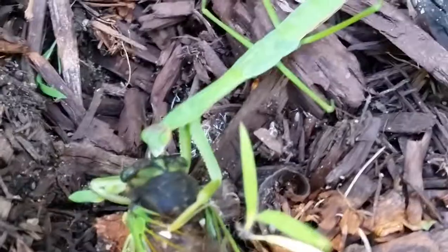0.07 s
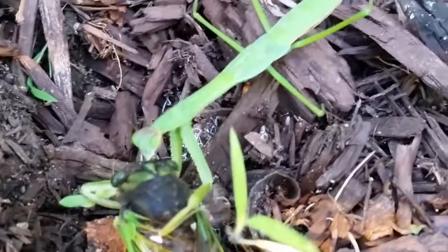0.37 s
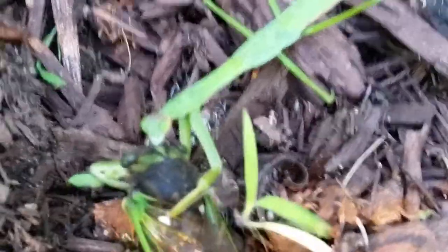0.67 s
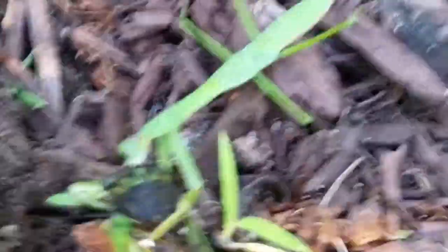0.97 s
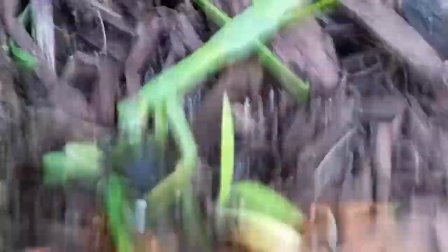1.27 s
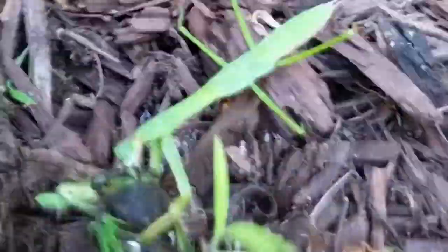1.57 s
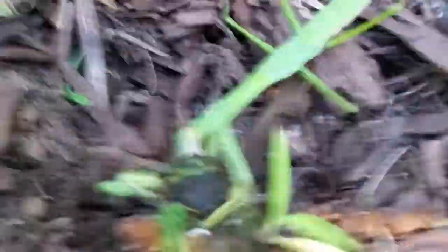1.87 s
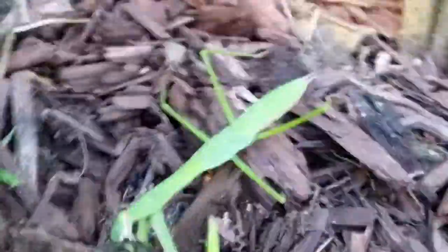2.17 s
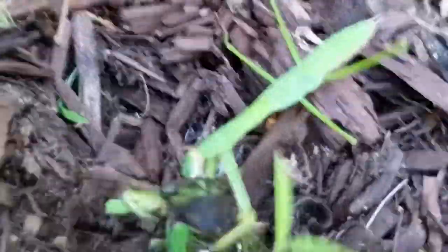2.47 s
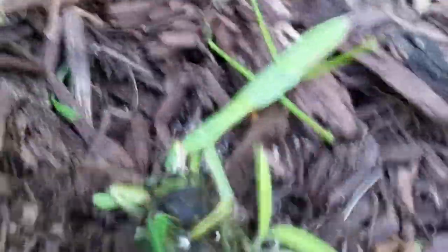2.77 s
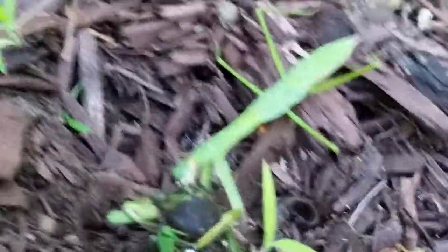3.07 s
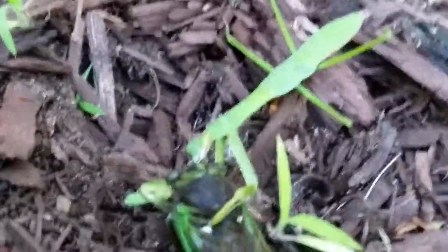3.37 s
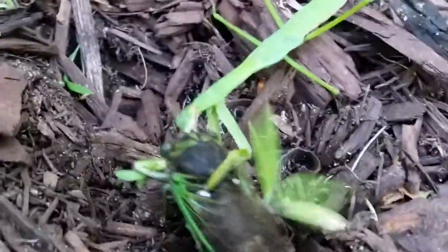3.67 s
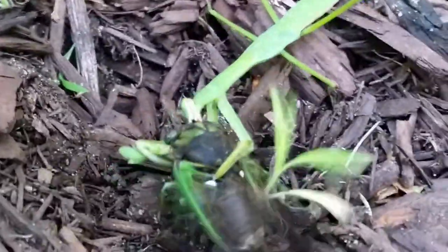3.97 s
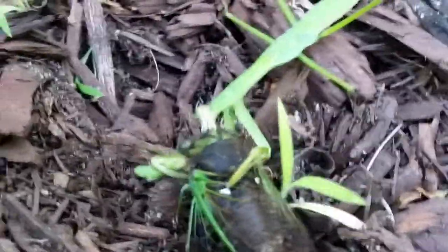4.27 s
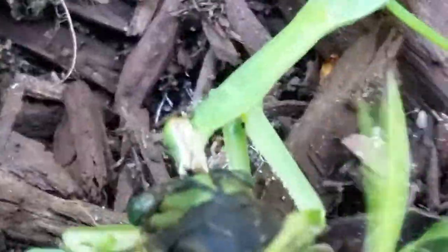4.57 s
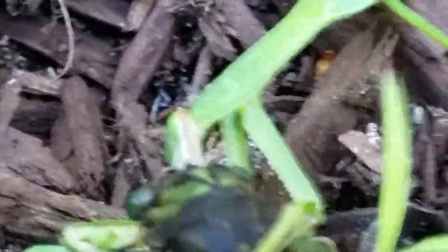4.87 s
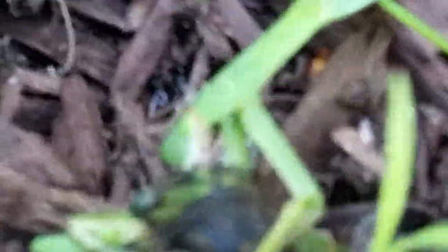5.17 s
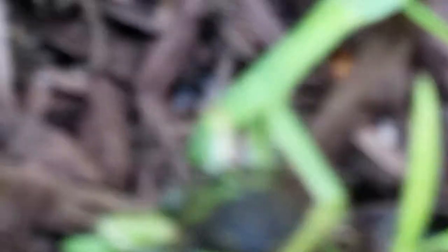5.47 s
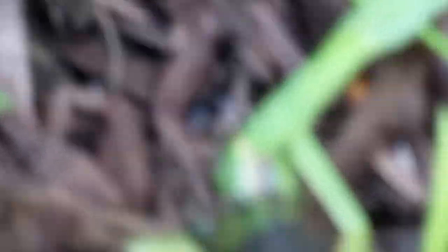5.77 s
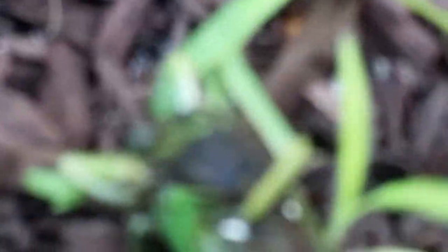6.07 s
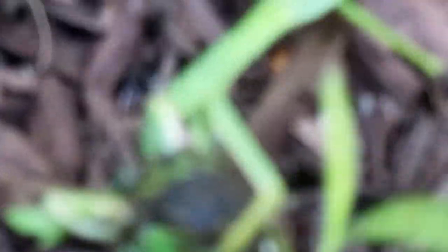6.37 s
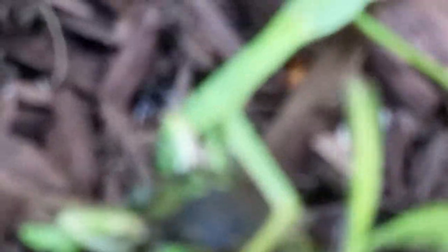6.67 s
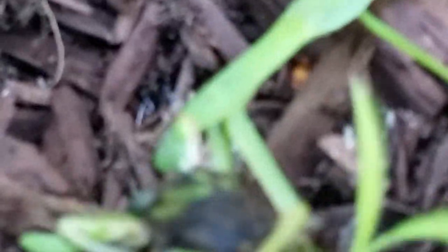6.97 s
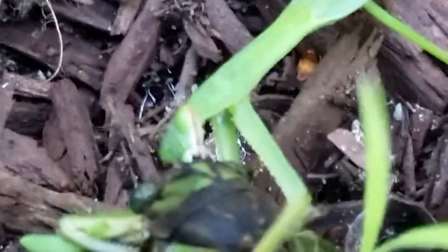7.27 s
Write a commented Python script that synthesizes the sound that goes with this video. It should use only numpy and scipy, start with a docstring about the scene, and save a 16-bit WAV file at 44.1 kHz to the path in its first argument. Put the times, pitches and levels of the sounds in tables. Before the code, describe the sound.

A cicada held by a mantis beats its wings against bark mulch in short, papery, rattling bursts, two or three a second. Early on, fingers knock and rub on the close hand-held microphone, giving dull thumps and a hiss. The flapping weakens briefly near the middle, then returns louder and in longer fits. Faint low rumble, leaves and distant insects sit underneath in the yard.

```python
"""A yard, down on the bark mulch: a cicada pinned by a mantis thrashes its wings in short fits,
about 33 beats a second. Each downstroke is a papery slap, each upstroke a weaker one, with dry
scraping between them and the odd snap of a bark chip. A hand-held phone close by adds finger
knocks and a rubbing hiss. Underneath sits a bed of low rumble, leaves and far-off insects."""
import sys
import numpy as np
from scipy import signal
from scipy.fft import rfft, irfft, next_fast_len
from scipy.io import wavfile
from scipy.ndimage import uniform_filter1d, map_coordinates

SR = 44100
rng = np.random.default_rng(int(sys.argv[2]) if len(sys.argv) > 2 else 0)


def materialize(psi):
    """Save the field psi as 16-bit PCM at rate SR to the path in sys.argv[1].

    A 1-D psi becomes a single channel; in a 2-D psi each row is a channel.
    """
    bounded = np.clip(np.atleast_2d(psi).T, -1, 1)
    quanta = np.round(bounded * 32767).astype(np.int16)
    wavfile.write(sys.argv[1], SR, quanta)


N = 322812
TIME = np.arange(N) / SR
GRIP_FROM_S, GRIP_TO_S = 1.15, 2.55  # the hand shifts its hold on the phone

# Levels and EQ gains are relative; pan_db is left minus right; correlation is between the channels.
# fader ride of the bed, dipping in the middle: time_s, level_db
BED_RIDE = [(0.4, -59), (1.0, -47), (2.75, -45), (3.15, -56.5), (3.5, -58.5), (3.85, -49.5), (4.3, -45),
            (6.1, -44.5), (7.3, -45.5)]
# tone of the low rumble: freq_hz, gain_db
RUMBLE_EQ = [(13, -41.5), (22, -12.5), (69, -2.5), (104, 1), (200, -7), (281, -13.5), (408, -17),
             (531, -23), (640, -26.5), (833, -44), (900, -39.5), (1170, -52.5), (1980, -120)]
RUMBLE_PAN = [(60, 0.26), (200, 0.0)]  # freq_hz, pan_db
RUMBLE_CORRELATION = [(40, 0.83), (130, 0.94), (600, 0.58)]  # freq_hz, correlation
# tone of the leaves and far insects: freq_hz, gain_db
YARD_EQ = [(300, -7), (700, 15), (1200, 13.5), (2200, 12.5), (3300, 4.5), (4000, 10.5), (4400, 20.5),
           (4850, 3), (5500, 18), (6200, 3.5), (7200, 10), (9000, 5), (10800, -2.5), (14500, 1.5)]
# where they sit: freq_hz, pan_db
YARD_PAN = [(800, -2), (2500, -3), (4400, 11.5), (9000, -2), (14000, 2.5)]
YARD_CORRELATION = [(700, 0.31), (3000, 0.05)]  # freq_hz, correlation

# a finger sliding by the left mic: start_s, end_s, level_db, swell_db
SLIDES = [(1.079, 1.27, -44.5, 7.5), (1.36, 1.456, -46.5, 2.5), (1.598, 1.84, -47.5, -18.5),
          (1.931, 2.175, -43, -16), (2.228, 2.28, -34, 2), (2.365, 2.507, -38.5, 8.5),
          (2.556, 2.662, -41.5, -4.5)]
# hiss of skin on the case: freq_hz, gain_db
SLIDE_EQ = [(200, 4), (700, -7), (1800, -8.5), (3200, -10.5), (4800, -8.5), (7000, -4.5), (9500, -4.5),
            (12500, -6.5), (15000, -14.5)]
# where that hiss sits: freq_hz, pan_db
SLIDE_PAN = [(1500, 3), (4000, 11.5), (14000, 14.5)]
# low end of the shifting grip: freq_hz, gain_db
GRIP_EQ = [(15, -18), (50, 3.5), (130, -4.0), (300, -15.5), (900, -28), (3000, -39.5)]
# fingers knocking the phone: time_s, level_db, thud_hz, pan_db
FINGER_KNOCKS = [(0.9094, -18, 468, -18), (0.9150, -14, 98, -17), (0.9217, -26.5, 380, 3),
                 (0.9490, -6, 341, -22), (1.2700, -17, 74, -3), (1.4380, -18, 132, -11),
                 (1.8290, -21.5, 161, 25), (1.951, -22, 332, 6), (1.9600, -12, 182, 32),
                 (1.9730, -15.5, 133, 9), (2.036, -20.5, 148, 21), (2.1950, -22.5, 151, 28),
                 (2.5230, -20, 97, -18), (2.7930, -3, 104.4, -27), (4.2570, -24.5, 337, -17)]
# tone of the tick on each knock: freq_hz, gain_db
TICK_EQ = [(20, -3), (200, -2.5), (700, -2.5), (1500, -10), (4000, -17), (9000, -23.5), (15000, -38)]
# ringing modes of the phone's case: pitch_hz, level_db, t60_s
CASE_MODES = [(244.7, 0.5, 0.31), (392, -6, .08), (560, -12.5, .04)]

# the bright click of the finger knock at 0.949 s, then bark chips snapping:
# time_s, level_db, pitch_hz, pan_db
SHARP_CLICKS = [(0.949, -25.5, 1940, 10), (1.068, -39, 7200, 15), (1.871, -18.5, 8600, 16.5),
                (3.942, -40.5, 9100, 9), (5.824, -38.5, 8500, -7)]
# fits of wingbeats: first_slap_s, last_slap_s, level_db, swell_db, scrape_offset_db
WING_FITS = [(0.096, 0.13, -31.5, -12, -17), (0.328, 0.4218, -30, 2.5, -11),
             (0.671, 0.767, -30.5, 3, -12.5), (1.138, 1.2, -29.5, -2, -25), (1.5726, 1.6695, -26, 7.5, -18),
             (1.903, 2.0234, -27.5, 2, -9), (2.218, 2.332, -31, -6, -5), (2.567, 2.66, -25.5, -3.5, -18),
             (2.838, 3.0226, -34, 0, -22), (3.2197, 3.3725, -40, -1, -14.5),
             (3.6032, 3.759, -37.5, 10, -24), (3.9885, 4.205, -28, 6.5, -15),
             (4.4273, 4.793, -24.5, 0, -14.5), (4.953, 5.099, -25.5, 4, -15.5),
             (5.297, 5.455, -25.5, 5, -16), (5.645, 5.769, -27.5, 1.5, -17), (5.96, 6.0623, -29, -3, -14.5),
             (6.24, 6.429, -30.5, 0.5, -13), (6.656, 6.834, -30, 7, -16.5), (7.03, 7.12, -30, 0, -22),
             (7.2836, 7.318, -31, 2, -15)]
# harder or out-of-step slaps: time_s, level_db
ACCENT_SLAPS = [(1.609, -23.5), (2.336, -25), (2.630, -24.5), (2.689, -32), (4.824, -33), (5.425, -24.5),
                (5.624, -34), (6.439, -26.5)]
# membranes tucked under the body: freq_hz, gain_db
TUCKED_EQ = [(1530, -47), (2600, -15), (3100, -19.5), (3440, -15.5), (5260, -11), (5870, -7), (6360, -9.5),
             (9180, 1), (10700, -0.5), (14000, -3), (15000, -14.5)]
# membranes spread on the bark: freq_hz, gain_db
SPREAD_EQ = [(1530, -10.5), (2600, -5), (2970, -12), (3440, -6), (4710, -3.5), (5570, -1.5), (7100, -4),
             (8400, 0.5), (9110, 0), (11700, -1.5), (12900, -5), (14000, 2), (14700, -5.5), (15000, -11.5)]
# membranes half folded: freq_hz, gain_db
FOLDED_EQ = [(1530, -37), (2600, -11), (3810, 8.5), (4440, 8.5), (5070, -28.5), (6790, 11), (7980, 7),
             (8910, 7), (9730, -36), (12100, -15), (13000, -2), (14000, -6), (15000, -11.5)]
# crossfade between the three: time_s, pose (0 tucked, 1 spread, 2 folded)
WING_POSE = [(1.7, 0.02), (3.0, 1.09), (3.75, 1.11), (4.0, 0.78), (4.9, 0.68), (5.3, 1.11), (6.5, 0.87)]
# the whole wing drumming: freq_hz, gain_db
DRUM_EQ = [(70, -2.5), (150, 14.5), (300, 5.5), (420, 6), (600, -3.5), (900, -0.5), (1400, -4), (2100, 4.5),
           (2800, -5.5), (3600, -4), (6000, -41)]
# fader ride of that drumming: time_s, level_db
DRUM_RIDE = [(0.9, -13.5), (1.7, -20.5), (3.0, -14), (5.4, -12), (6.8, -8)]
# where each band of the wings sits: freq_hz, pan_db
WING_BAND_PAN = [(200, 2), (1300, -3), (2400, 2.5), (4400, 8), (5700, 7.5), (8000, 0), (10500, -4.5),
                 (14500, -2.5)]
# stereo image of the wings, wider in the treble: freq_hz, correlation
WING_CORRELATION = [(200, 1), (1500, 0.75), (4000, 0.14), (14000, 0.13)]
# pan move of the whole wing layer: time_s, pan_db
WING_PAN_MOVE = [(1.1, -4.5), (1.6, 1.26)]


def amp(db):
    """Decibels to gain."""
    return 10 ** (np.asarray(db) / 20)


def unit(x):
    """Normalise to rms 1."""
    return x / np.sqrt(np.mean(x ** 2) + 1e-20)


def along(points, hz):
    """Read (freq_hz, value) breakpoints on a log axis."""
    freqs, values = np.transpose(points)
    return np.interp(np.log(hz + 1), np.log(freqs + 1), values)


def curve(rows):
    """Automation lane through (time_s, value) breakpoints."""
    return np.interp(TIME, *np.transpose(rows))


def wobble(rate_hz):
    """Smooth random modulation."""
    return map_coordinates(rng.standard_normal(int(N * rate_hz / SR) + 4), [TIME * rate_hz])


def held_db(start, end, rise_db_per_s, fall_db_per_s):
    """Envelope: attack up to start, hold at 0 dB, release after end."""
    return -rise_db_per_s * np.maximum(start - TIME, 0) - fall_db_per_s * np.maximum(TIME - end, 0)


def filtered(x, response):
    """EQ x with a gain given as a function of frequency."""
    size = next_fast_len(N + SR // 2)
    return irfft(rfft(x, size) * response(np.fft.rfftfreq(size, 1 / SR)), size)[..., :N]


def pan(pan_db):
    """Constant-power left and right gains."""
    pair = np.array([amp(pan_db / 2), amp(-pan_db / 2)])
    return pair / np.sqrt(np.mean(pair ** 2, axis=0))


def add(track, time_s, sound):
    """Drop a sound onto a track."""
    part = track[..., round(time_s * SR):][..., :sound.shape[-1]]
    part += sound[..., :part.shape[-1]]


def flicker(x, depth_db, bins, frames):
    """Make the tone flicker with random gain patches, bins wide and frames long, in each channel."""
    spectrum = signal.stft(x, nperseg=256)[2]
    patches = uniform_filter1d(rng.standard_normal(spectrum.shape), bins, axis=1)
    patches = uniform_filter1d(patches, frames, axis=2)
    return signal.istft(spectrum * amp(depth_db * unit(patches)), nperseg=256)[1][:, :N]


def noise(eq, band_pan, correlation):
    """Stereo noise of rms 1, with tone, pan and width set by frequency."""
    size = next_fast_len(N, real=True)
    hz = np.fft.rfftfreq(size, 1 / SR)
    width = np.arccos(np.clip(along(correlation, hz), -1, 1)) / 2
    spectra = rfft(rng.standard_normal((2, size))) * amp(along(eq, hz))
    mid, side = spectra * [np.cos(width), np.sin(width)]
    stereo = np.array([mid + side, mid - side]) * pan(along(band_pan, hz))
    return unit(irfft(stereo, size)[:, :N])


def yard_bed(rumble_trim_db=0.5, yard_db=-57, yard_swing=1.46):
    """Unsteady rumble under the hiss of leaves and far insects, which follow its fader more widely."""
    rumble = noise(RUMBLE_EQ, RUMBLE_PAN, RUMBLE_CORRELATION)
    yard = noise(YARD_EQ, YARD_PAN, YARD_CORRELATION)
    ride_db = curve(BED_RIDE)
    rumble_gain = amp(ride_db + rumble_trim_db + 2.5 * wobble(14))
    yard_gain = amp(yard_db + yard_swing * (ride_db - np.median(ride_db)) + 0.27 * wobble(3.7))
    return rumble_gain * rumble + yard_gain * yard


def hand_rub(fade_db_per_s=402, grip_db=-38.5):
    """Skin sliding on the case hisses unevenly; the shifting grip rumbles in each mic separately."""
    hiss = noise(SLIDE_EQ, SLIDE_PAN, correlation=[(1000, .1)])
    hiss = unit(flicker(hiss, depth_db=1.8, bins=7, frames=30))
    grip = noise(GRIP_EQ, band_pan=[(100, -0.92)], correlation=[(100, 0.046)])
    slides = np.zeros(N)
    for start, end, db, swell_db in SLIDES:
        ramp_db = swell_db * curve([(start, -.5), (end, .5)])
        slides += amp(db + ramp_db + held_db(start, end, fade_db_per_s, fade_db_per_s))
    grip_fade_db = held_db(GRIP_FROM_S, GRIP_TO_S, rise_db_per_s=5, fall_db_per_s=66.5)
    grip_gain = amp(grip_db + grip_fade_db + 3.6 * wobble(32))
    return slides * amp(2.4 * wobble(120)) * hiss + grip_gain * grip


def finger_nudges(count=6, level_db=-27, thud_hz=110, pan_spread_db=10):
    """Small chance bumps while the hold shifts, as extra rows for the knocks."""
    jitter, force, pitch, side = rng.uniform(-1, 1, (count, 4)).T
    progress = (np.arange(count) + .5 + .5 * jitter) / count
    times = GRIP_FROM_S + (GRIP_TO_S - GRIP_FROM_S) * progress
    return np.c_[times, level_db + 2 * force, thud_hz * 2 ** (.5 * pitch), pan_spread_db * side]


def finger_knocks(press_s=0.00025, tick_s=0.003, rattle_t60_s=0.027, ring_peak_hz=337):
    """A finger lands with a damped thud and a sharp tick, and sets the phone's case ringing."""
    thuds, ticks = np.zeros((2, 2, N))
    t = np.arange(SR // 2) / SR
    case = sum(amp(db - 60 * t / t60) * np.sin(2 * np.pi * hz * t) for hz, db, t60 in CASE_MODES)
    case *= 1 - np.exp(-t / 0.0017)
    for time_s, db, hz, pan_db in np.r_[FINGER_KNOCKS, finger_nudges()]:
        t60_s = 0.02 + 0.65 / hz  # a softer, lower thud lasts longer
        thud = 1.96 * np.sin(2 * np.pi * hz * t) * amp(-60 * t / t60_s) * (1 - np.exp(-t / press_s))
        ring_db = -7.5 - 12 * abs(np.log2(hz / ring_peak_hz))  # 12 dB less per octave off the peak
        gain = amp(db) * pan(pan_db)[:, None]
        add(thuds, time_s, gain * (thud + amp(ring_db) * case))
        # the tick is a sudden push plus a short rattle of the case
        push = np.exp(-t / tick_s)
        rattle = amp(-8 - 60 * t / rattle_t60_s) * rng.standard_normal(len(t))
        tick_db = 1 + 0.19 * db  # harder knocks have more bite
        add(ticks, time_s, gain * amp(tick_db) * (rattle - push))
    return thuds + filtered(ticks, lambda hz: amp(along(TICK_EQ, hz)))


def sharp_clicks(t60_s=0.011):
    """One knock's bright click, then bark chips snapping: each is four brief partials and noise."""
    track = np.zeros((2, N))
    t = np.arange(SR // 30) / SR
    for time_s, db, hz, pan_db in SHARP_CLICKS:
        partials_hz = hz * np.exp(0.1 * rng.standard_normal(4))
        ring = sum(np.sin(2 * np.pi * f * t) for f in partials_hz) / 2
        click = amp(db - 60 * t / t60_s) * (ring + .5 * rng.standard_normal(len(t)))
        add(track, time_s - .001, pan(pan_db)[:, None] * click)
    return track


def slap_power(hits, trim_db=2.0, rise_s=.0016, fall_s=.0025, crack_db=-4, crack_s=0.00031):
    """Power envelope of wing hits (time_s, level_db): each swells, cracks on impact, then fades."""
    t = np.arange(-SR // 100, SR // 40) / SR
    swell = np.exp(np.where(t < 0, t / rise_s, -t / fall_s))
    crack = amp(crack_db) * np.exp(-np.abs(t) / crack_s)
    power = np.zeros(N)
    for time_s, db in hits:
        add(power, time_s + t[0], amp(db + trim_db) ** 2 * (swell ** 2 + crack ** 2))
    return power


def wing_fit(first, last, db, swell_db, scrape_db, beat_hz=32.7, up_phase=.58, feeble_db=-3):
    """One burst of thrashing, as hits and a scrape envelope; it opens and closes on a feeble upstroke."""
    count = max(round((last - first) * beat_hz), 1)
    progress = np.arange(-1, count + 2) / count  # one spare beat at each end
    inside = np.clip(progress, 0, 1)
    ends = np.r_[1, np.zeros(count + 1), 1]
    # a short fit quickens; a long one tires and slows
    mid_lag_s = .002 - 0.0482 * max(last - first - 0.212, 0)
    times = first + (last - first) * progress + mid_lag_s * np.sin(np.pi * inside)
    levels = db + swell_db * (inside - .5)
    scatter = rng.standard_normal((count + 3, 4)) * [.7, 1.3, .0005, 1]
    down_scatter_db, up_scatter_db, late_s, stray_scatter_db = scatter.T
    downstrokes = np.c_[times, levels + down_scatter_db][1:-1]
    # an upstroke only brushes the bark, harder when the wing drags
    brush_db = levels - 1 + 0.45 * scrape_db
    upstrokes = np.c_[times + up_phase / beat_hz + late_s, brush_db + up_scatter_db][:-1]
    upstrokes[[0, -1], 1] += feeble_db
    # one stray touch somewhere in each beat
    stray_times = times + rng.random(count + 3) / beat_hz
    strays = np.c_[stray_times, brush_db - 0.5 + stray_scatter_db][1:-2]
    # the wing tips stay on the bark between slaps
    scrape = amp(np.interp(TIME, times, levels + scrape_db - 20 * ends, left=-120, right=-120))
    return np.r_[downstrokes, upstrokes, strays], scrape


def membrane_crackle():
    """Veins catch on splinters, so the stiff membranes give clusters of tiny cracks, toned by pose."""
    grain = unit(amp(2.4 * wobble(2800) + 1.5 * wobble(300)))
    pose = curve(WING_POSE)
    membrane = np.zeros((2, N))
    for index, eq in enumerate((TUCKED_EQ, SPREAD_EQ, FOLDED_EQ)):
        share = np.clip(1 - np.abs(pose - index), 0, 1)
        membrane += np.sqrt(share) * noise(eq, WING_BAND_PAN, WING_CORRELATION)
    # each stroke lands a little differently and favours other resonances
    membrane = unit(flicker(membrane, depth_db=2.6, bins=2, frames=6))
    membrane = unit(flicker(membrane, depth_db=1.8, bins=2, frames=40))
    return grain * membrane


def cicada_wings(drum_trim_db=4.0, scrape_trim_db=-1.0, rustle_db=-22, rustle_s=.05):
    """Every stroke crackles in the membranes, drums the whole wing and leaves the mulch rustling."""
    power = slap_power(ACCENT_SLAPS)
    for fit in WING_FITS:
        hits, scrape = wing_fit(*fit)
        power += slap_power(hits) + (amp(scrape_trim_db) * scrape) ** 2
    decay = np.exp(-1 / (rustle_s * SR))
    rustle_tail = amp(rustle_db) ** 2 * signal.lfilter([1 - decay], [1, -decay], power)
    envelope = np.sqrt(power + rustle_tail)
    crackle = membrane_crackle()
    drum = noise(DRUM_EQ, WING_BAND_PAN, WING_CORRELATION)
    drum = unit(flicker(drum, depth_db=1.8, bins=1, frames=24))
    drum_gain = amp(drum_trim_db + curve(DRUM_RIDE))
    left, right = envelope * pan(curve(WING_PAN_MOVE)) * (crackle + drum_gain * drum)
    return np.array([np.roll(left, 6), right])  # the nearer right mic hears it 6 samples sooner


def scene():
    """The mix: the struggle up front, handling noise around it, the yard behind."""
    return cicada_wings() + sharp_clicks() + finger_knocks() + hand_rub() + yard_bed()


def record(dry, ceiling=.93, open_s=.081, top_hz=14900):
    """The phone rounds off the hardest knocks, opens its input a moment late and cuts the very top."""
    soft_clipped = dry / (1 + np.abs(dry / ceiling) ** 8) ** (1 / 8)
    return filtered(soft_clipped * (TIME > open_s), lambda hz: 1 / np.sqrt(1 + (hz / top_hz) ** 140))


dry = scene()
out = record(dry)
materialize(out)
```